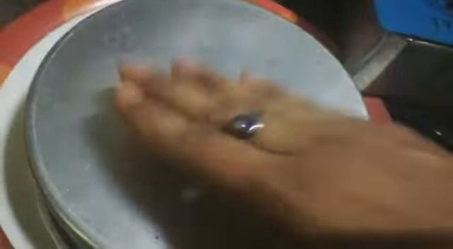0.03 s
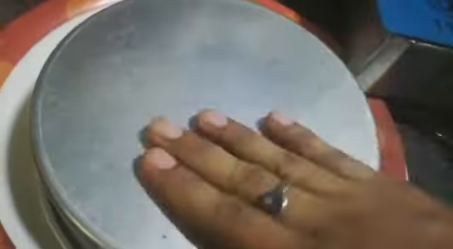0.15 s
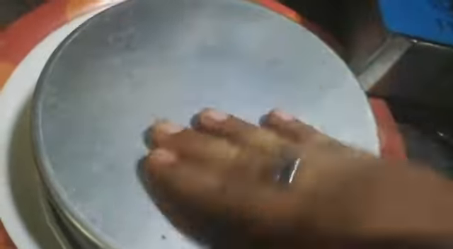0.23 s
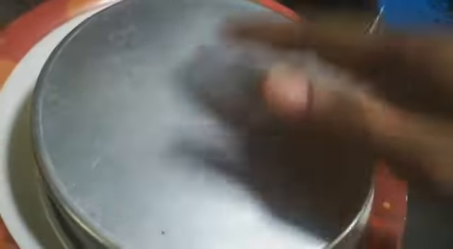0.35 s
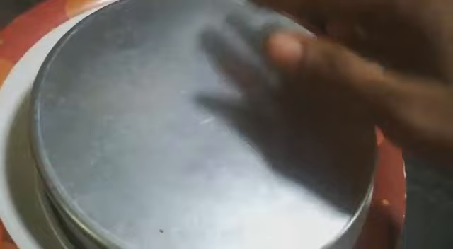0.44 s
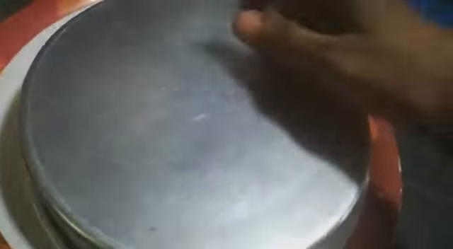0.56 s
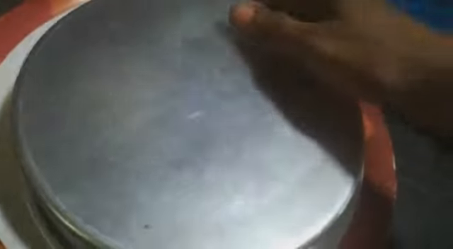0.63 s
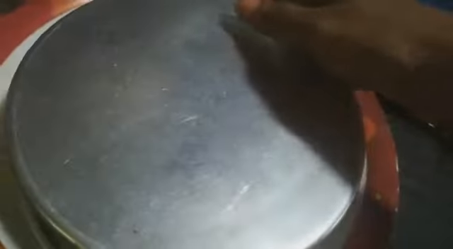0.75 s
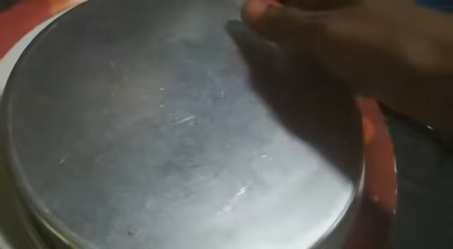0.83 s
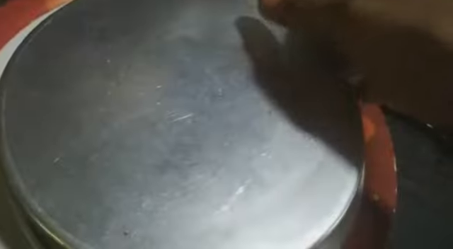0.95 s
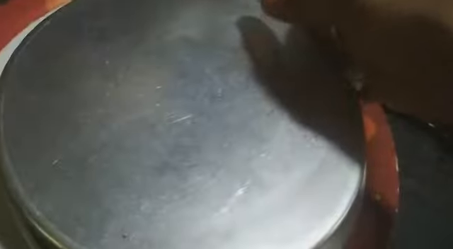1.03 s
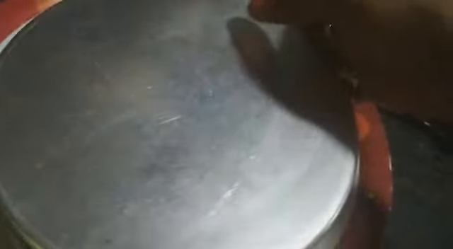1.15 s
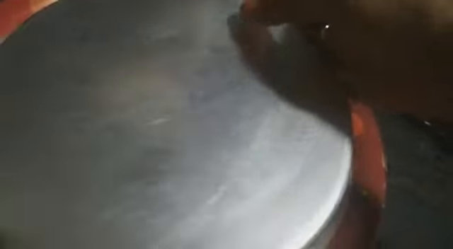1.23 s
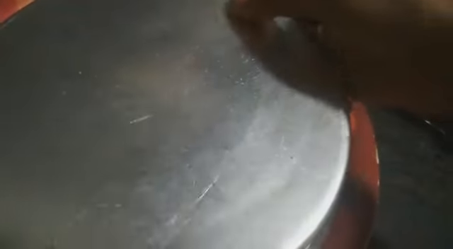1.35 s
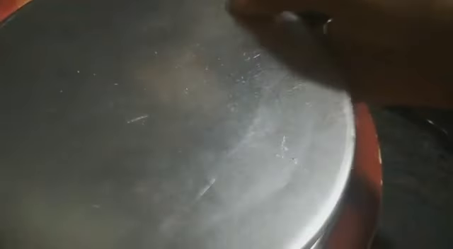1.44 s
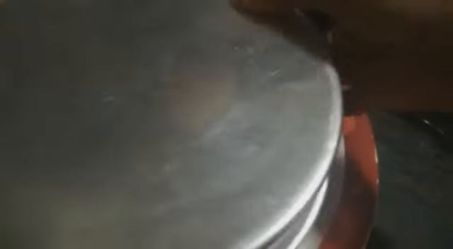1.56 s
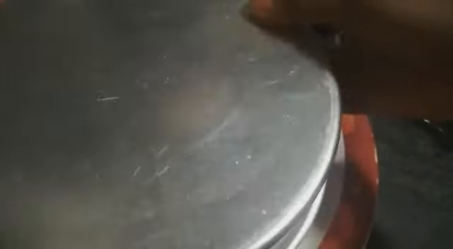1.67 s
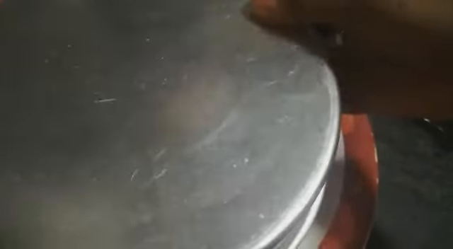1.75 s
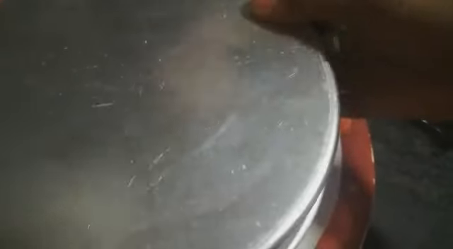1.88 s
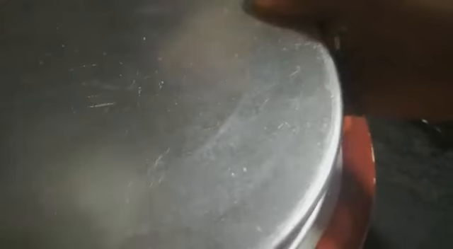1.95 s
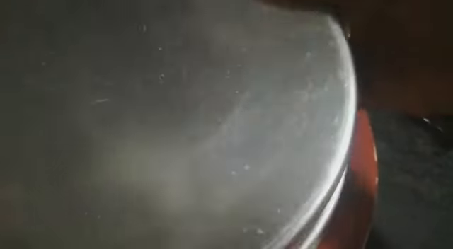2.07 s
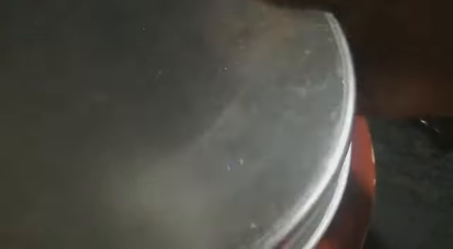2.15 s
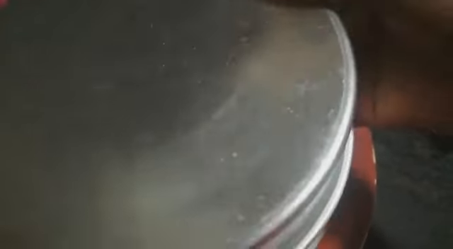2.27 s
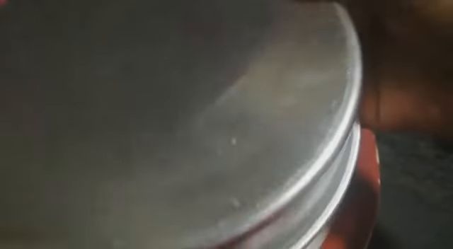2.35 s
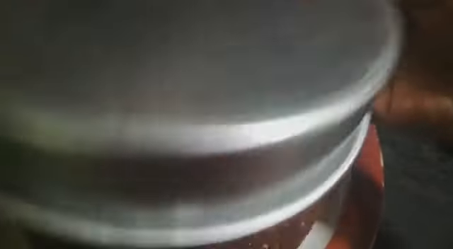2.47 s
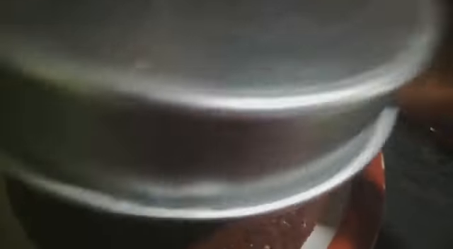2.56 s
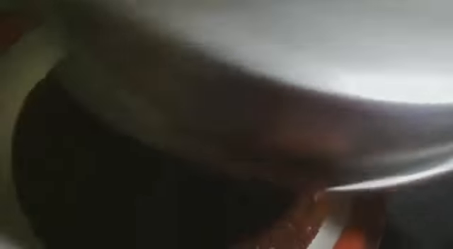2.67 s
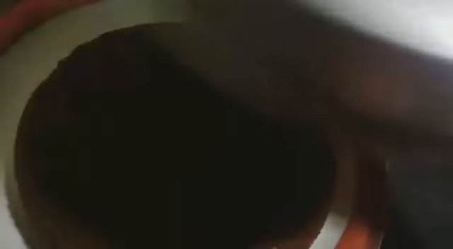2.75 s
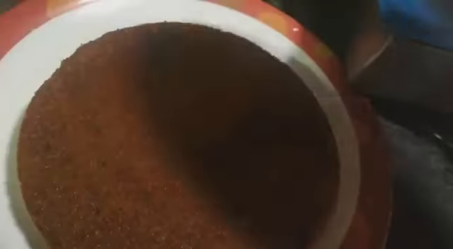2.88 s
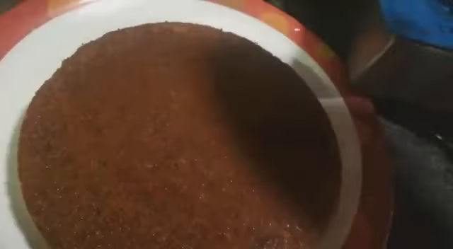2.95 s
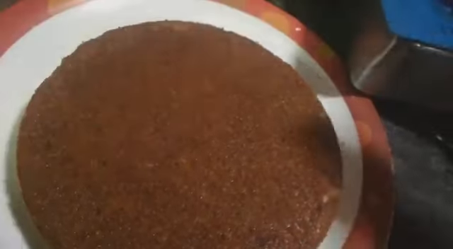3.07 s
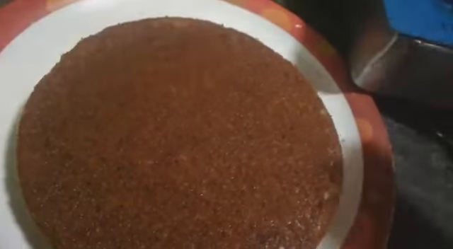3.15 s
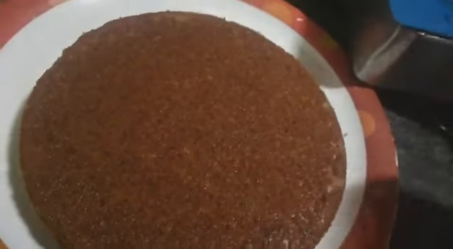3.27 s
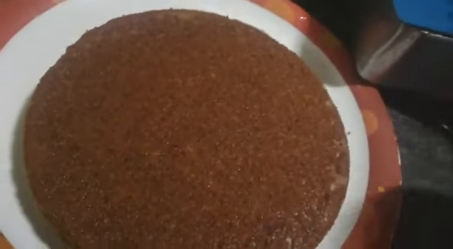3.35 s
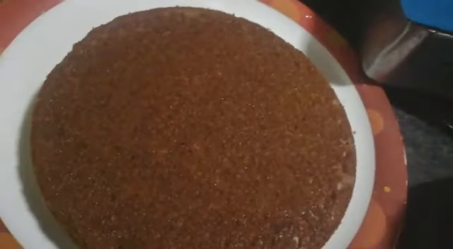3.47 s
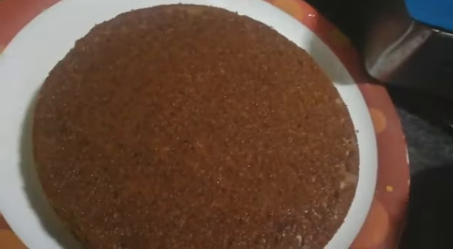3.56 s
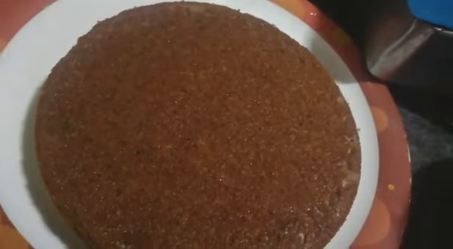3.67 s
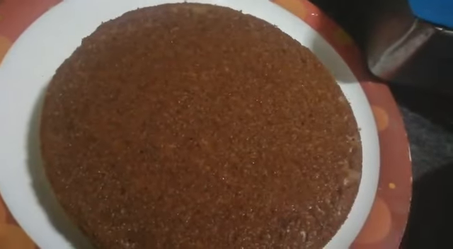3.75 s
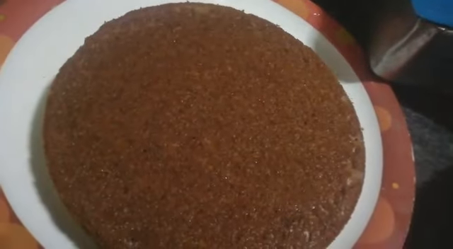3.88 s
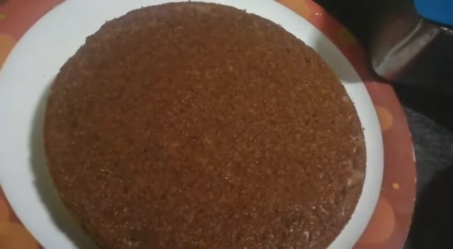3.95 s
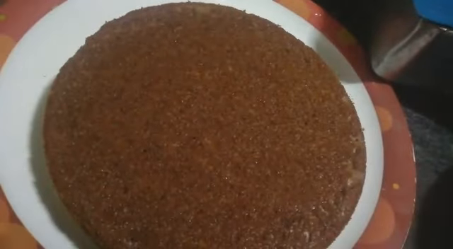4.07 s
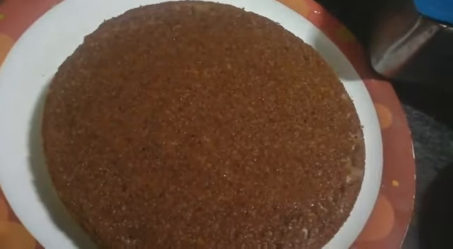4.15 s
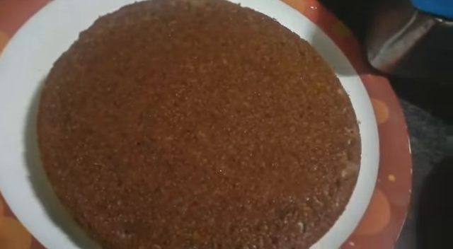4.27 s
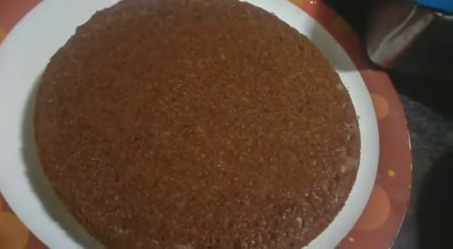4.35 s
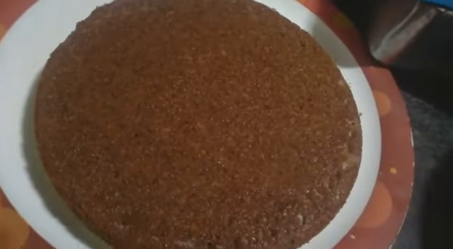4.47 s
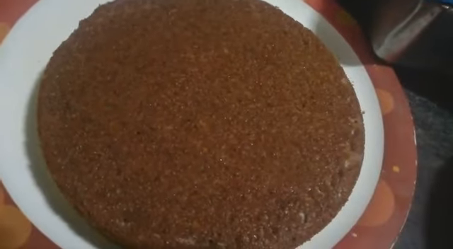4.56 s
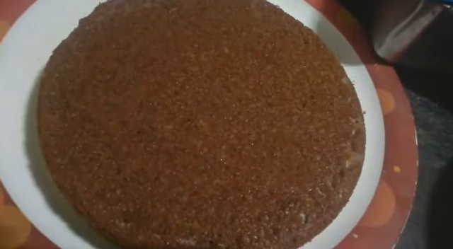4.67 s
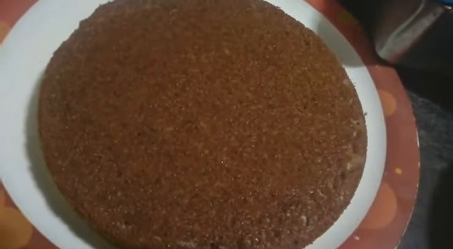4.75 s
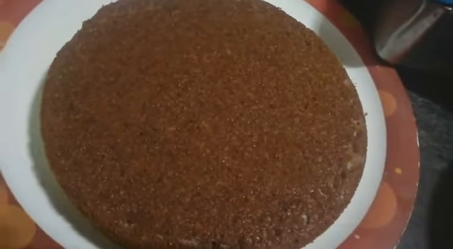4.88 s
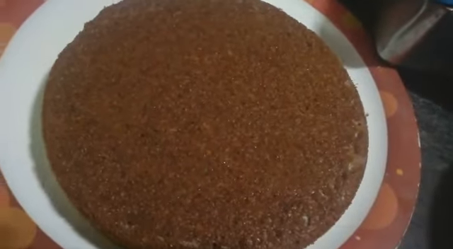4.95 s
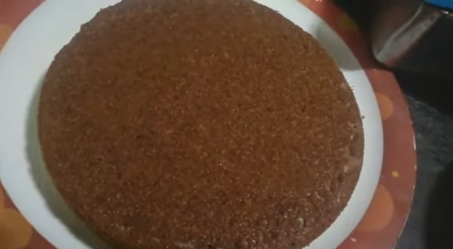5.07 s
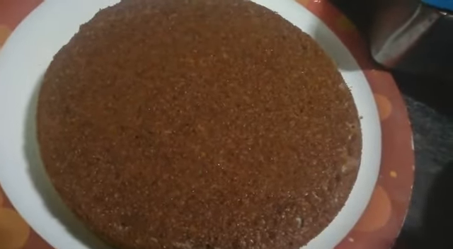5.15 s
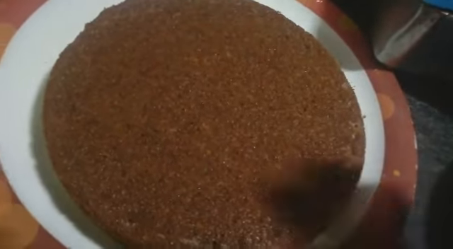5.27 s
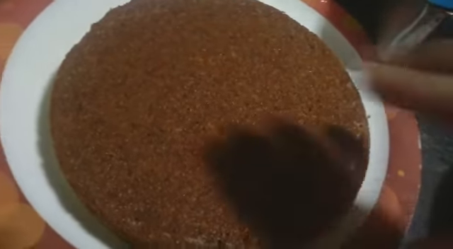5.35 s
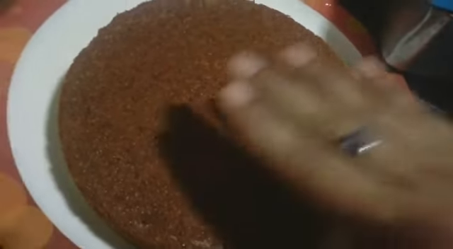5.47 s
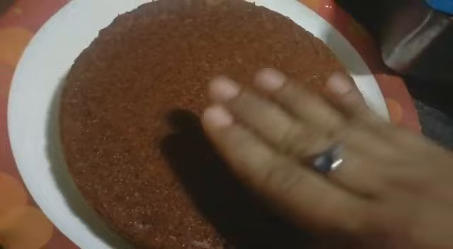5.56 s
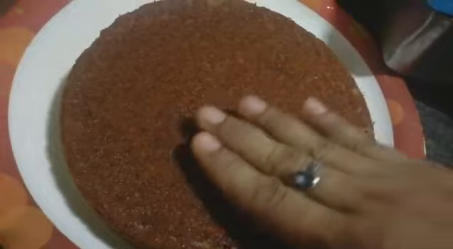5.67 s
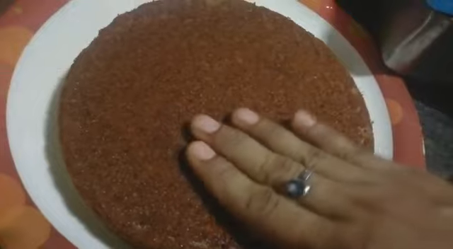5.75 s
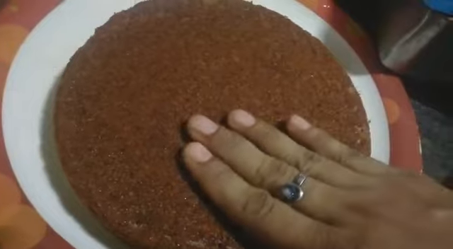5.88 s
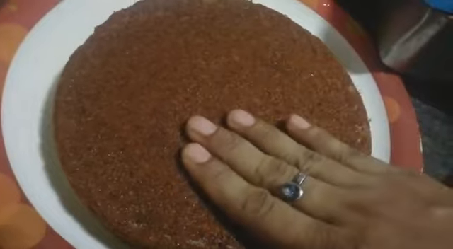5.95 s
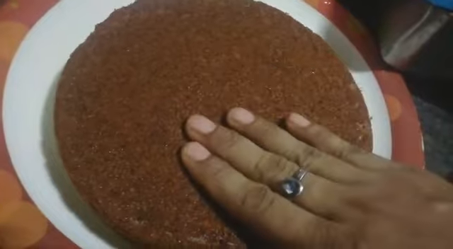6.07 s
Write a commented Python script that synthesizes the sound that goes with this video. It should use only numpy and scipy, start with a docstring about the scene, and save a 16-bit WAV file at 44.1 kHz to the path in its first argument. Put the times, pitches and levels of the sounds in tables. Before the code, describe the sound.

An upturned cake tin is tapped lightly, banged three times on its plate with rim clatter, then shoved aside with faint scraping and ticks.

```python
"""A metal baking tin, upside down on a plate in a small kitchen, knocks three times as the cake drops out:
damped pushes make the thuds of its flexing base, and bursts of noise through ringing modes its rim clatter.
A hand taps and shifts it first, with the same kind of contacts; then roughened friction noise scrapes it
aside and the hand comes to rest on the cake with a short squeak of the plate. All of it is close to a
hand-held two-port microphone with its bumps, room reflections, steady room noise and gain control."""
import sys
import numpy as np
from scipy import signal
from scipy.fft import rfft, irfft, next_fast_len
from scipy.io import wavfile
from scipy.ndimage import uniform_filter1d

SR = 44100
rng = np.random.default_rng(int(sys.argv[2]) if len(sys.argv) > 2 else 0)


def unload_audio(sound):
    """Save the sound as a 16-bit wav file, at the path given as the first command line argument."""
    columns = np.transpose(np.atleast_2d(sound))
    # keep every value between -1 and 1, then stretch to whole-number steps
    steps = np.round(np.clip(columns, -1, 1) * 32767)
    wavfile.write(sys.argv[1], SR, steps.astype(np.int16))


N = 269936
TIME = np.arange(N) / SR

# the tin knocks on the plate: (time [s], thud [dB], thud pitch [Hz], rebound [dB],
# jolt of the microphone [dB], hum of the hollow [dB])
KNOCKS = [(2.2817, -1.5, 399, -32, -21.5, -42), (2.5328, 1.5, 367, -19, -27, -30.5),
          (2.7701, -2, 328, -16, -33, -31.5)]
# light taps of hand and finger ring: (time [s], level [dB], tilt [dB per octave], favoured band [Hz],
# share of the ring time that the grip leaves [ratio], buzz [dB], thud [dB], thud pitch [Hz])
TAPS = [(0.001, -8, 0.5, 2100, 0.57, -30.5, -26, 139), (0.0622, -15.5, 1, 3370, 0.59, -30.5, -59, 260),
        (0.529, -26, -0.5, 2000, 0.73, -43, -48, 270), (1.5483, -18, 0.5, 2430, 0.16, -55, -20.5, 235),
        (1.676, -32.5, 0, 2800, 0.4, -57, -25, 250), (4.006, -30, 2.5, 900, 1, -56, -23, 284)]
# friction noise of rubbing: (frequency [Hz], density [dB per Hz])
RUB_NOISE = [(200, 7), (1500, -1), (4000, -0.5), (7000, 1), (9000, -7.5), (13000, -26.5)]


def from_db(db):
    """Decibels to gain."""
    return 10 ** (np.asarray(db) / 20)


def rms_one(x):
    """Scale to an rms of 1."""
    return x / np.sqrt(np.mean(x ** 2) + 1e-20)


def at_hz(points, hz):
    """Read a table along a log-frequency axis."""
    f, value = np.transpose(points)
    return np.interp(np.log(np.maximum(hz, 1)), np.log(f), value)


def add(track, s, sound):
    """Mix a sound into a track from time s on."""
    start = max(round(s * SR), 0)
    track[start:start + len(sound)] += sound[:N - start]


def colour_db(hz, tilt_db, spot_hz, spot_db):
    """A tilt sets how hard a contact sounds, and each spot on the tin has a band of its own."""
    spot_octaves = 0.37   # half width of the favoured band
    tilt = tilt_db * np.log2(np.clip(hz, 400, 7000) / 3000)
    return tilt + spot_db * np.exp(-(np.log2(hz / spot_hz) / spot_octaves) ** 2)


def noise(spectrum, size, colour=None):
    """Random-phase noise of rms 1 with the given spectrum, and the colour of a contact if there is one."""
    hz = np.maximum(np.fft.rfftfreq(size, 1 / SR), 1)
    level_db = at_hz(spectrum, hz)
    if colour:
        level_db = level_db + colour_db(hz, *colour)
    phases = np.exp(2j * np.pi * rng.random(len(hz)))
    return rms_one(irfft(from_db(level_db) * phases, size))


def resonate(x, modes):
    """Parallel resonances, each with its own gain at the peak and ring time."""
    out = 0
    for hz, level_db, t60 in modes:
        r = np.exp(-np.log(1000) / (t60 * SR))
        poles = [1, -2 * r * np.cos(2 * np.pi * hz / SR), r * r]
        ring = (1 - r * r) / 2 * signal.lfilter([1, 0, -1], poles, x + 1e-18)
        out = out + from_db(level_db) * ring
    return out


def pushes(rows, onset_share=1):
    """A heavily damped push swells and dies within a few swings; onset_share is rise time over fall time."""
    out = np.zeros(N)
    t = TIME[:SR // 4] - 1 / 8
    for s, level_db, hz, half_s in rows:
        width = half_s * np.where(t < 0, onset_share, 1)
        swing = -np.sin(2 * np.pi * hz * t)
        add(out, s + t[0], from_db(level_db) * np.exp(-(t / width) ** 2) * swing)
    return out


def base_thuds(count):
    """The base flexes and rebounds in a knock, gives once under a tap, and swings count times in a wobble."""
    # the base wobbles as fingers leave it, and later as the cake settles:
    # (time [s], level of the first swing [dB], pitch [Hz])
    wobbles = [(0.533, -20.5, 294), (2.846, -27.5, 362)]
    flex_half_s = 0.0027
    rows = []
    for s, thud_db, hz, rebound_db, *_ in KNOCKS:
        flex = (s, thud_db, hz, flex_half_s)
        overtone = (s, thud_db - 23.5, 570, 0.0026)
        rebound = (s + 0.0111, rebound_db, 303, flex_half_s)
        rows += [flex, overtone, rebound]
    for s, *_, thud_db, hz in TAPS:
        rows.append((s + 0.0042, thud_db, hz, 0.0015))
    gap_s, loss_db, half_s = 0.0099, 3.5, 0.0039   # between swings, per swing, of one swing
    for s, level_db, hz in wobbles:
        for k in range(count):
            stray = 1 + 0.15 * rng.uniform(-0.81, 1)   # the pitch strays from swing to swing
            rows.append((s + k * gap_s, level_db - k * loss_db, hz * stray, half_s))
    return pushes(rows, onset_share=0.78)


def contacts(rows, spectrum, modes, body_db, spread_db, detune):
    """Each contact is a brief, uneven chatter that builds, dies and rings the modes a little differently."""
    out = np.zeros(N)
    t = TIME[:SR // 3]
    for s, level_db, rise, decay, ring_share, *colour in rows:
        uneven = from_db(3 * rms_one(uniform_filter1d(rng.standard_normal(len(t)), size=24)))   # 3 dB rms
        envelope = np.minimum(t / rise, 1) * np.exp(-t / decay)
        chatter = rms_one(noise(spectrum, len(t), colour) * uneven * envelope)
        sound = chatter
        for hz, mode_db, t60 in modes:
            strength, stretch = rng.standard_normal(2)
            ring = rms_one(resonate(chatter, [(hz * (1 + detune * stretch), 0, t60 * ring_share)]))
            ring_db = body_db + mode_db + colour_db(hz, *colour) + spread_db * strength
            sound = sound + from_db(ring_db) * ring
        # a longer contact of the same level carries more energy
        length_gain = np.sqrt(decay * SR / (2 * len(t)))
        add(out, s, from_db(level_db) * length_gain * rms_one(sound))
    return out


def rim_contacts():
    """The rim touches, grazes, clacks and rattles, buzzes after a tap, and ticks as the tin is moved aside."""
    # rim meets plate or worktop, or the loose tin buzzes after a tap: (time [s], level [dB], rise [s],
    # decay [s], tilt [dB per octave], favoured band [Hz], boost of that band [dB])
    touches = [ (2.2805, -4, 0.0003, 0.0017, 1.5, 6500, 0), (2.2822, -6.5, 0.0011, 0.0032, 0, 1150, 11),
               (2.2841, -2, 0.0012, 0.0021, 2, 6530, 4), (2.2885, -21, 0.0023, 0.0045, -5, 2930, 12),
               (2.298, -24, 0.0044, 0.02, -5.5, 3000, 9), (2.5299, -17, 0.00027, 0.0055, 0.5, 6600, -1),
               (2.538, -9, 0.0017, 0.003, -3, 3670, 3), (2.5469, -3.5, 0.00017, 0.0014, 1.5, 1210, 9),
               (2.5533, -25, 0.00073, 0.0076, -3.5, 3000, 10),
               (2.7686, -8, 0.00098, 0.0017, -2.5, 5250, 8.5), (2.7748, -11, 0.003, 0.003, -3.5, 2940, 7.5),
               (2.786, -11, 0.00018, 0.0029, 0, 790, 6), (2.7985, -24, 0.0023, 0.009, -2.5, 2700, 5),
               (0.098, -35.5, 0.008, 0.012, 5, 3530, 21), (3.352, -36, 0.003, 0.013, 6, 6000, 4),
               (4.16, -32, 0.0005, 0.0069, -7, 1800, 6), (4.221, -33, 0.0005, 0.0033, -4, 2000, 10),
               (4.2777, -27, 0.0003, 0.007, 2.5, 7100, 7), (5.004, -26, 0.0003, 0.0046, 7.5, 2860, 6),
               (6.008, -28.5, 0.001, 0.007, -0.5, 2120, 9)]
    # contact noise: (frequency [Hz], density [dB per Hz])
    clatter = [(35, -20), (130, -1), (300, 2.5), (620, 7.5), (1200, 5.5), (2500, 10.5), (3400, 7.5),
               (4600, 2), (6600, 3.5), (8000, -3), (10200, -5), (13000, -29)]
    # rim against plate: (frequency [Hz], energy before the common body level [dB], t60 [s])
    rim_modes = [(545, -25, 0.053), (654, -19, 0.06), (795, -8.5, 0.033), (1174, -21, 0.024),
                 (2204, -5, 0.047), (2555, -36, 0.054), (2840, -5, 0.015), (3170, -11, 0.028),
                 (3400, -17.5, 0.019), (4360, -13, 0.012), (4970, -16, 0.048), (6150, 2, 0.024),
                 (6060, -15.5, 0.019), (6240, -10, 0.078), (7070, 0, 0.04)]
    rows = []
    for s, level_db, rise, decay, *colour in touches:
        rows.append((s, level_db, rise, decay, 1, *colour))
    return contacts(rows, clatter, rim_modes, body_db=-13, spread_db=2.5, detune=0.0147)


def hollow():
    """Each knock sets the air in the tin humming as decaying sines, more freely once the cake is loose."""
    # hollow of the tin: (frequency [Hz], level before the knock's own [dB], t60 [s])
    hollow_modes = [(121, -5, 0.31), (185, 0, 0.37), (287, 4, 0.1)]
    out = np.zeros(N)
    t = TIME[:SR // 2]
    hum = 0
    for hz, mode_db, t60 in hollow_modes:
        hum = hum + from_db(mode_db - 60 * t / t60) * np.sin(2 * np.pi * hz * t)
    for s, *_, hollow_db in KNOCKS:
        add(out, s, from_db(hollow_db) * hum)
    return out


def hand_taps():
    """Each tap lands on the base, bounces once and sets the loose tin buzzing; a firm grip shortens the ring."""
    # tapping noise: (frequency [Hz], density [dB per Hz])
    tap_noise = [(100, -7), (300, -1.5), (1000, 3), (2200, 12.5), (3500, 3), (5000, -4), (7000, -2),
                 (9000, -11), (13000, -23)]
    # base of the tin: (frequency [Hz], energy before the common body level [dB], t60 [s])
    base_modes = [(129, -3, 0.21), (262, 4.5, 0.38), (570, -6.5, 0.073), (1510, -4, 0.076),
                  (2000, -5, 0.06), (2045, 1, 0.062), (2300, -15, 0.09), (2600, -3, 0.1), (3300, -16, 0.14),
                  (3510, 1, 0.035), (4030, -9, 0.086), (4700, -5, 0.04), (6164, -17, 0.2),
                  (7300, -24, 0.12)]
    rise_s, spot_db = 0.000079, 3.5
    rows = []
    for s, level_db, tilt_db, spot_hz, ring_share, buzz_db, *_ in TAPS:
        colour = (tilt_db, spot_hz, spot_db)
        landing = (s, level_db, rise_s, 0.0022, ring_share, *colour)
        bounce = (s + 0.001915, level_db - 5, rise_s, 0.0026, ring_share, *colour)
        buzz = (s + 0.012, buzz_db, 0.0052, 0.016, ring_share, 2.5, spot_hz, 0)
        rows += [landing, bounce, buzz]
    return contacts(rows, tap_noise, base_modes, body_db=-7.0, spread_db=2.0, detune=0.012)


def swells(rows, swell_db):
    """Level of sliding movements: each grows by swell_db up to its middle, sinks again and stops."""
    level = np.zeros(N)
    stop_s = 0.005   # time to start or come to rest
    for start, length, level_db in rows:
        half = length / 2
        from_middle = np.abs(TIME - start - half)
        moving = np.clip((half - from_middle) / stop_s + 1, 0, 1)
        level += moving * from_db(level_db - swell_db * from_middle / half)
    return level


def friction(level, spectrum, modes, grit_db=-24):
    """A sliding surface catches on bumps and crumbs and judders, which roughens the hiss and rings the modes."""
    # click of a crumb: (frequency [Hz], gain [dB], t60 [s])
    crumb_modes = [(2320, 8, 0.0037), (3300, 2, 0.0033), (6540, -13, 0.0021)]
    grains = rms_one(uniform_filter1d(rng.standard_normal(N), size=30))
    judder = rms_one(uniform_filter1d(rng.standard_normal(N), size=400))
    crumbs_per_s = 140
    crumbs = (rng.random(N) < crumbs_per_s / SR) * rng.uniform(-0.92, 1, N)
    hiss = noise(spectrum, N) * from_db(3.6 * grains + 1.8 * judder)   # roughness in dB rms
    hiss = hiss + from_db(grit_db) * rms_one(resonate(crumbs, crumb_modes))
    return level * rms_one(hiss + resonate(hiss, modes))


def shoves():
    """The tin scrapes over the worktop on another part of its rim in each shove, and rings higher or lower."""
    # shoves: (start [s], length [s], level [dB], pitch of the ring [ratio], strength of the ring [dB],
    # favoured band [Hz])
    shove_rows = [(3.774, 0.21, -32.5, 1.07, -3.5, 2830), (4.09, 0.18, -29.5, 1.016, 2.5, 1800)]
    # friction noise: (frequency [Hz], density [dB per Hz])
    scrape = [(200, -21), (900, -11.5), (1400, -4.5), (2400, 2.5), (3700, -4.5), (5200, -5), (6800, -6),
              (8500, -9), (13000, -24)]
    # tin dragged on its rim: (frequency before the pitch ratio [Hz], gain before the ring strength [dB],
    # t60 [s])
    slide_modes = [(890, 15, 0.028), (1905, 12, 0.017), (2170, -15, 0.0074), (2560, -9, 0.019),
                   (3190, 7, 0.021), (3940, 3.5, 0.0055), (5460, 9.5, 0.017), (6110, 13, 0.018),
                   (6880, 6, 0.0078)]
    out = 0
    for start, length, level_db, pitch, ring_db, spot_hz in shove_rows:
        modes = [(hz * pitch, mode_db + ring_db, t60) for hz, mode_db, t60 in slide_modes]
        modes.append((spot_hz, 2, 0.002))
        level = swells([(start, length, level_db)], swell_db=13)
        out = out + friction(level, scrape, modes, grit_db=-5)
    return out


def finger_rubs():
    """Fingers rub over tin, plate and cake: friction noise that swells with each stroke."""
    # strokes: (start [s], length [s], level [dB])
    strokes = [(0.17, 0.097, -54), (0.44, 0.16, -41.5), (0.56, 0.1, -45.5), (0.75, 1, -52.5),
               (1.45, 0.11, -50), (3.16, 0.14, -43), (3.315, 0.081, -43.5), (3.3, 0.26, -44.5),
               (4.025, 0.025, -40), (4.62, 0.13, -43), (4.75, 0.17, -43), (4.87, 0.11, -37)]
    # fingers rubbing: (frequency [Hz], gain over the friction noise [dB], t60 [s])
    rub_modes = [(2140, 7, 0.0034), (4770, -26, 0.026), (6220, 10.5, 0.029), (6860, -3, 0.0024),
                 (10400, 7.5, 0.0075)]
    return friction(swells(strokes, swell_db=13.5), RUB_NOISE, rub_modes)


def plate_squeak():
    """The hand comes to rest and nudges the plate, whose grating on the worktop rings strong modes."""
    # nudges: (start [s], length [s], level [dB])
    nudges = [(6.013, 0.052, -35)]
    # plate on worktop: (frequency [Hz], gain over the friction noise [dB], t60 [s])
    squeak_modes = [(1030, 26, 0.046), (1454, 32, 0.074), (2217, 28.5, 0.087), (2770, 13, 0.06),
                    (3640, 14, 0.054), (6180, 28, 0.014), (10120, 24, 0.015)]
    return friction(swells(nudges, swell_db=4), RUB_NOISE, squeak_modes)


def handling():
    """The microphone is softly bumped by the hand that holds it and jolted by each knock: low damped pushes."""
    # bumps: (time of the middle [s], level [dB], pitch [Hz])
    hand_bumps = [(1.188, -26.5, 58.7), (2.036, -28.5, 58), (4.62, -35, 34), (4.649, -38, 50),
                  (4.681, -34.5, 43), (4.886, -32, 55), (4.934, -26, 69)]
    half_cycles = 0.35   # half width of a bump in cycles of its pitch
    rows = [(s, level_db, hz, half_cycles / hz) for s, level_db, hz in hand_bumps]
    rows += [(s, jolt_db, 124, 0.0045) for s, *_, jolt_db, _ in KNOCKS]
    return pushes(rows)


def microphones(x):
    """The right port, farther off, hears a sound later and partly shadowed."""
    # what the far port hears: (frequency [Hz], gain against the near port [dB])
    port_shadow = [(200, 0.5), (400, -2), (1000, -36), (2000, -8), (4000, -41), (7000, -17), (12000, -10.5)]
    lag_s = 0.000624   # extra travel time to the far port
    size = next_fast_len(N + SR // 10)
    hz = np.fft.rfftfreq(size, 1 / SR)
    path = from_db(at_hz(port_shadow, hz)) * np.exp(-2j * np.pi * hz * lag_s)
    return np.array([x, irfft(rfft(x, size) * path, size)[:N]])


def kitchen(x, early_db, early_decay, tail_db, right_db):
    """Quick reflections off worktop and walls, then a faint tail that dies band by band."""
    # room tail: (frequency [Hz], t60 [s])
    kitchen_t60 = [(200, 0.39), (1000, 0.28), (4000, 0.22), (12000, 0.33)]
    t = TIME[:SR // 2]
    edges = np.geomspace(100, 14000, num=8)
    tail = 0
    for low, high in zip(edges, edges[1:]):
        band_pass = signal.butter(2, [low, high], "band", fs=SR, output="sos")
        band = signal.sosfilt(band_pass, rng.standard_normal((2, len(t))))
        t60 = at_hz(kitchen_t60, np.sqrt(low * high))
        tail = tail + band * np.exp(-np.log(1000) * t / t60)
    tail = tail * np.clip(t / 0.028, 0, 1)
    early = rng.standard_normal((2, len(t))) * np.exp(-t / early_decay) * np.clip(t / 0.00087, 0, 1) ** 2
    response = from_db(early_db) * rms_one(early) + from_db(tail_db) * rms_one(tail)
    response = response / np.sqrt(len(t))
    return signal.fftconvolve(x[None], response, axes=1)[:, :N] * from_db([[0], [right_db]])


def room_noise(level_db, hum_db):
    """Steady air noise, alike at both ports in the deep bass, with a wavering hum of resonated noise."""
    # air noise: (frequency [Hz], density [dB per Hz])
    air_spectrum = [(15, -6), (25, 2), (53, -0.5), (137, -7), (169, -21), (270, -3.5), (316, -12.5),
                    (351, -2.5), (507, -18), (694, -10.5), (1560, -8.5), (1920, -12), (2930, -15),
                    (7120, -25), (13000, -44)]
    # left against right: (frequency [Hz], likeness before clipping [ratio])
    likeness = [(60, 12), (130, 0.3), (280, 0.63), (610, -0.61), (1310, 0.17), (2830, -0.11), (6000, 0)]
    # left against right: (frequency [Hz], balance [dB])
    air_balance = [(300, 0.5), (660, -4), (1200, 1.5), (2200, 2), (4000, 6), (7250, 0)]
    hz = np.fft.rfftfreq(N, 1 / SR)
    alike = np.clip(at_hz(likeness, hz), -.9, .99)
    signs = np.array([[1], [-1]])   # left, right
    mid = rfft(noise(air_spectrum, N))
    side = rfft(noise(air_spectrum, N)) * np.sqrt((1 - alike) / (1 + alike))
    balance = from_db(signs * at_hz(air_balance, hz) / 2)
    air = irfft((mid + signs * side) * balance, N)
    hum_modes = [(280.5, 7.5, 0.24), (352.0, -24.0, 0.42), (112.8, 2.0, 0.051)]   # Hz, dB, t60 s
    hum = rms_one(resonate(rng.standard_normal(N), hum_modes))
    return from_db(level_db) * air + from_db(hum_db) * hum


def scene():
    """The sounds of tin and hand reach the two ports directly and by way of the room."""
    thuds = base_thuds(count=5)
    metal = rim_contacts() + hand_taps() + shoves()
    rubs = finger_rubs() + plate_squeak()
    tin = metal + thuds + hollow()
    direct = microphones(tin) + microphones(rubs) * from_db([[0], [3]])   # right port raised for the rubs
    room = kitchen(metal + rubs + from_db(-2) * thuds,
                   early_db=-5.5, early_decay=0.0093, tail_db=-21.0, right_db=-2.0)
    return direct + room + handling() + room_noise(level_db=-47, hum_db=-52.5)


def gain_control(x, threshold_db, release_db_per_s):
    """Loud peaks turn the gain of both channels down, and it creeps back up."""
    peak_db = 20 * np.log10(np.abs(x).max(axis=0) + 1e-9)
    over = np.maximum(peak_db - threshold_db, 0)
    release = release_db_per_s * TIME
    held = np.maximum.accumulate(over + release) - release
    r = np.exp(-1 / (0.037 * SR))   # smoothing over 37 ms
    return x * from_db(-signal.lfilter([1 - r], [1, -r], held))


def record(dry):
    """Gain control, rounded peaks near full scale, and a steep cut of the top."""
    loud = gain_control(dry, threshold_db=-2.5, release_db_per_s=20)
    rounded = loud / (1 + (loud / .8) ** 6) ** (1 / 6)
    cutoff_hz = 13300
    return signal.sosfilt(signal.ellip(10, .1, 80, cutoff_hz, fs=SR, output="sos"), rounded)


dry = scene()
out = record(dry)
unload_audio(out)
```